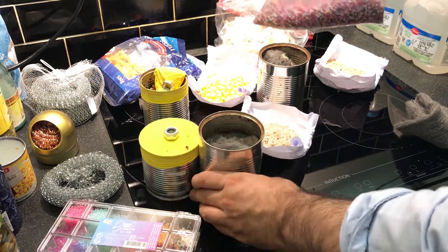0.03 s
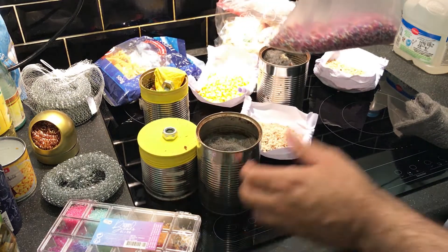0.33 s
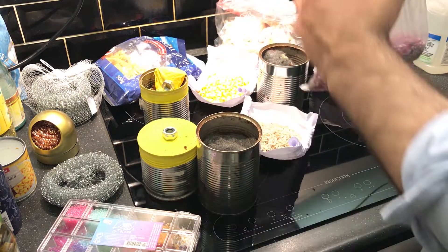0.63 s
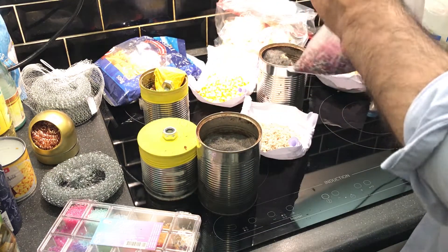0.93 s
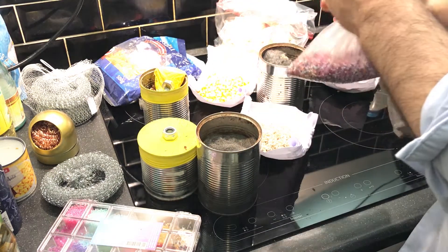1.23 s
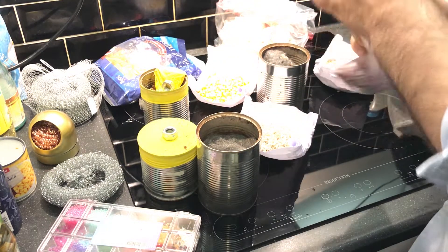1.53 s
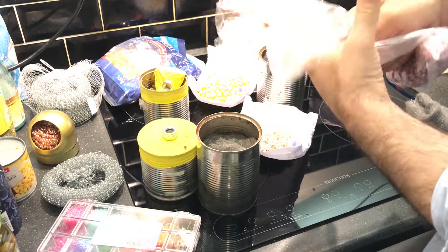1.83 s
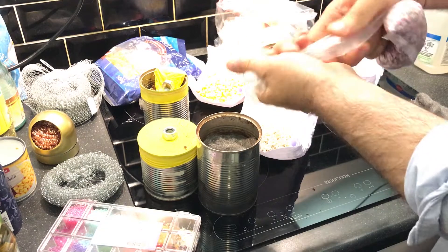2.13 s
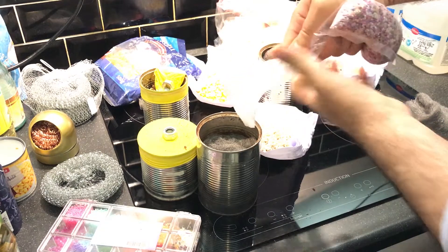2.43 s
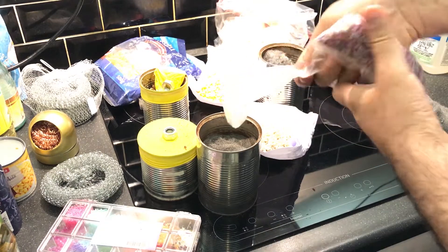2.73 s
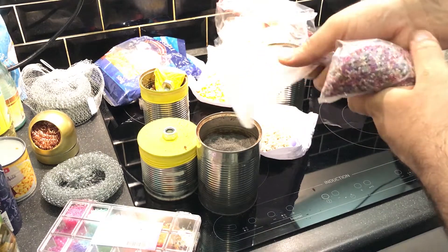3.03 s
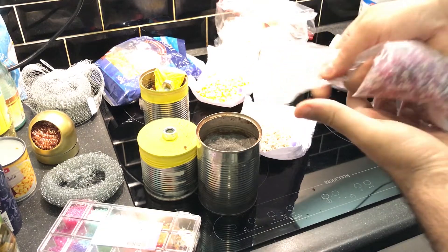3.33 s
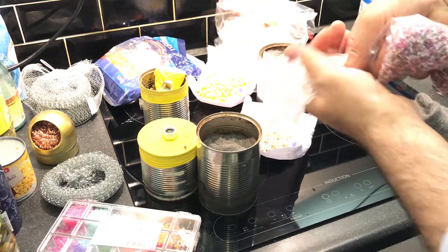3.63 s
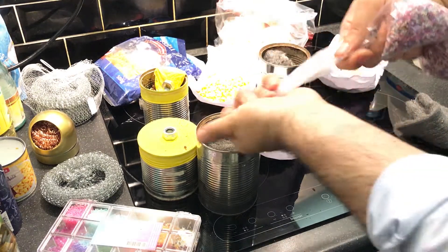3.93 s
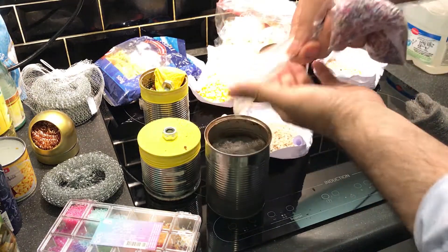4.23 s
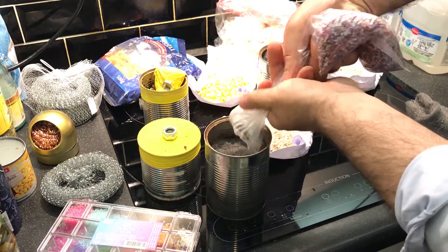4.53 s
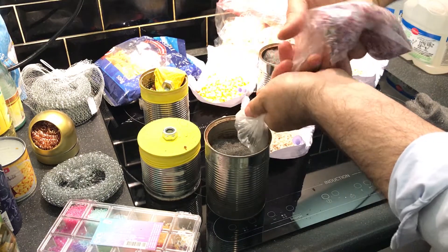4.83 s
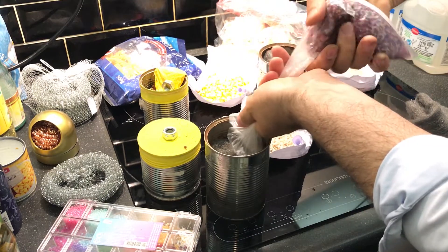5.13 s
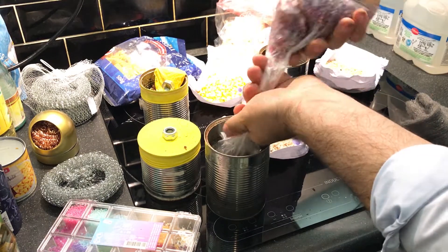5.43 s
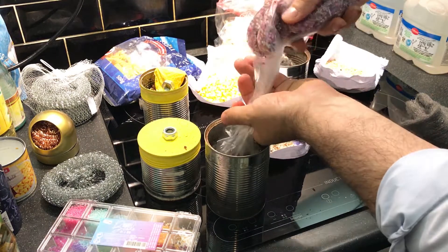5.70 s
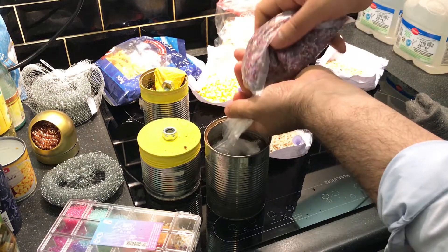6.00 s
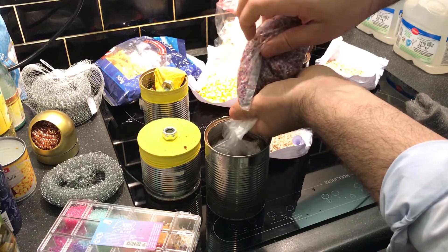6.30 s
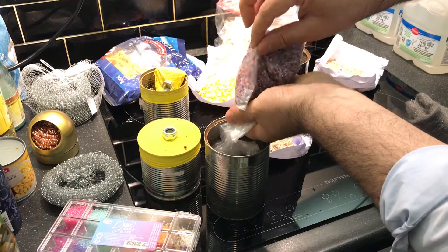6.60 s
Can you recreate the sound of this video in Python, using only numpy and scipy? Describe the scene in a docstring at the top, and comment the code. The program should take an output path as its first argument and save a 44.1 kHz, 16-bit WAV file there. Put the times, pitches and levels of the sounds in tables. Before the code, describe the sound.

Small beads slide and hiss in a crinkling plastic bag, and an empty tin clanks once on a glass hob.

```python
"""Small beads slide in a thin plastic bag that is picked up, tipped, squeezed and twisted over a hob.
Thousands of tiny collisions make a hiss, the heap rustles and thuds as it shifts, and creases snap.
A hand catches an empty tin, which tips and clanks back onto the hob's glass.
A small kitchen with a faint low rumble, heard from close by, in mono, on a phone's microphone."""
import sys
import numpy as np
from scipy import signal
from scipy.fft import rfft, irfft
from scipy.io import wavfile
from scipy.ndimage import uniform_filter1d

SR = 44100
rng = np.random.default_rng(int(sys.argv[2]) if len(sys.argv) > 2 else 0)


def persist_wave(psi):
    """Save psi, clipped to +-1, as 16-bit WAV."""
    counts = np.round(np.clip(psi, -1, 1) * 32767).astype(np.int16)
    wavfile.write(sys.argv[1], SR, np.atleast_2d(counts).T)


N = 293706


def undb(db):
    """Decibels to gain."""
    return 10 ** (np.asarray(db) / 20)


def curve(rows):
    """Rows of (seconds, value), joined by straight lines."""
    times, values = np.transpose(rows)
    return np.interp(np.arange(N) / SR, times, values)


def unit(x):
    """Scale to rms 1."""
    return x / np.sqrt(np.mean(x ** 2))


def fade(t, t60):
    """Exponential decay that loses 60 dB in t60 seconds."""
    return np.exp(-np.log(1000) * t / t60)


def add(track, start_s, sound):
    """Mix a sound into a track."""
    i = max(int(start_s * SR), 0)
    track[i:i + len(sound)] += sound[:max(len(track) - i, 0)]


def colour(x, points, size=4096):
    """Causal filter through (Hz, dB) points, built from the cepstrum."""
    hz, db = np.transpose(points)
    grid = np.maximum(np.fft.rfftfreq(size, 1 / SR), 1)
    gain = undb(np.interp(np.log(grid), np.log(hz), db))
    cepstrum = irfft(np.log(gain))
    cepstrum[1:size // 2] *= 2
    cepstrum[size // 2 + 1:] = 0
    return signal.fftconvolve(x, irfft(np.exp(rfft(cepstrum))))[:len(x)]


def resonate(x, hz, width_hz):
    """Two-pole band-pass, gain 1 at the centre."""
    return signal.lfilter(*signal.iirpeak(hz, hz / width_hz, fs=SR), x)


def wander(per_s):
    """Random levels, per_s of them a second, each gliding into the next; rms 1."""
    hold = int(SR / per_s)
    steps = np.repeat(rng.standard_normal(N // hold + 1), hold)
    return unit(uniform_filter1d(steps, hold)[:N])


def collisions(per_s, spread_db):
    """Tiny impacts at random moments and of unequal size; the mean power is the same at any rate."""
    chance = np.clip(per_s / SR, 1e-5, 1)
    hit = rng.random(N) < chance
    size = undb(spread_db * np.clip(rng.standard_normal(N), -2, 2))
    polarity = np.sign(rng.random(N) - .5)
    return unit(hit * size * polarity / np.sqrt(chance))


def kitchen_rumble():
    """Faint low kitchen rumble, briefly muted near the start, as a noise suppressor would mute it."""
    # The still kitchen's spectrum. Each row: frequency in Hz, relative level in dB.
    spectrum = [(20, -12), (45, -4), (75, 2.5), (110, -8), (160, 2), (220, -15), (400, -17.5), (1000, -20),
                (8000, -48)]
    # The gain put on the rumble, with the brief muting. Each row: time in seconds, gain in dB.
    gains = [(0, -65), (.08, -82), (.15, -104), (.21, -89), (.26, -73.5), (.5, -74), (.8, -68),
             (6.66, -69.5)]
    return unit(colour(rng.standard_normal(N), spectrum)) * undb(curve(gains))


def kitchen_echo(x, t60_low, t60_high):
    """Echo alone: hob and tiles answer within milliseconds, then the room dies away, treble first."""
    t = np.arange(SR // 3) / SR
    noise = rng.standard_normal(len(t))
    low = signal.sosfilt(signal.butter(2, 1100, fs=SR, output="sos"), noise)
    high = signal.sosfilt(signal.butter(2, 1100, "high", fs=SR, output="sos"), noise)
    tail = (low * fade(t, t60_low) - high * fade(t, t60_high)) * (t > .003)
    return signal.oaconvolve(x, tail / np.linalg.norm(tail))[:N]


def tin_clink(start_s, db, hz, width_hz):
    """One mode rings lightly and briefly as the fingers leave the tin."""
    out, t = np.zeros(N), np.arange(SR // 10) / SR
    add(out, start_s, undb(db) * np.sin(2 * np.pi * hz * t) * np.exp(-np.pi * width_hz * t))
    return out


def tin_knocks():
    """Each blow rings the same modes while the rim chatters on the glass; soft contacts lose treble."""
    # The tin's blows on the hob. Each row: start in seconds, relative level in dB,
    # contact softness in milliseconds, relative level of the rim's scrape in dB.
    knocks = [(4.162, -12.5, 0.4, 1), (4.179, -24, 0.53, 3), (4.216, -28.5, 0.15, 3),
              (4.245, -23, 0.064, 3), (4.2593, 0.5, 0.017, 0), (4.2847, -28.5, 0.0071, 19),
              (4.2961, -7, 0.31, 6.5), (5.811, -25, 0.21, 8)]
    # The tin's modes. Each row: frequency in Hz, relative level in dB, t60 in seconds.
    modes = [(290, -18, 0.21), (344, -8, 0.12), (418, -9.5, 0.081), (590, -8, 0.19), (679, 4, 0.096),
             (741, -0.5, 0.16), (777, 1, 0.13), (819, 1, 0.1), (1026, 0, 0.056), (1237, 7.5, 0.029),
             (1427, -4.5, 0.067), (1634, 4, 0.05), (1910, -5, 0.071), (1987, 0, 0.054), (2186, 4, 0.035),
             (2410, 7, 0.048), (2680, -7, 0.058), (2810, 0, .07), (3124, -2, 0.055), (4090, -3.5, 0.033),
             (4340, 1, 0.034)]
    # The scraping rim's spectrum. Each row: frequency in Hz, relative level in dB.
    rim_colour = [(60, -13), (300, -6), (700, 2), (1500, -3), (2600, 1.5), (4200, -7), (6000, -12.5),
                  (9500, -17.5), (12500, -6), (16000, -19)]
    out, t = np.zeros(N), np.arange(SR // 2) / SR
    ring = sum((-1) ** k * undb(db) * np.sin(2 * np.pi * hz * t) * fade(t, t60)
               for k, (hz, db, t60) in enumerate(modes))
    # the rim keeps scraping while the tin settles flat
    settle = fade(np.maximum(t - .005, 0), t60=0.044) + 0.087 * fade(t, t60=0.18)
    # the hob's glass pane is slower to answer, and booms
    boom = fade(t, t60=0.29) - fade(t, t60=0.081)
    for start_s, db, soft_ms, rim_db in knocks:
        grit = rng.standard_normal(len(t))
        scrape = unit(colour(grit, rim_colour)) * settle
        blow = undb(-24.5) * ring + undb(rim_db - 20) * scrape
        pole = np.exp(-1000 / (soft_ms * SR))
        softened = signal.lfilter([1 - pole], [1, -pole], blow)
        add(out, start_s, undb(db) * softened)
        pane = unit(resonate(resonate(grit, hz=70, width_hz=65), hz=75, width_hz=210))
        add(out, start_s, undb(0.85 * db - 39) * pane * boom)
    return out


def creases():
    """A fold buckles with one sharp tick, and the film around it shivers for a few milliseconds."""
    # The loudest creases. Each row: start in seconds, peak level in dB, centre frequency in Hz.
    snaps = [(0.3232, -42, 11900), (0.4497, -44, 11700), (.4853, -40, 8700), (.7068, -24, 12700),
             (0.768, -25, 13000), (0.9286, -29, 6400), (1.721, -25.5, 3800), (1.8445, -22, 12200),
             (2.317, -30, 3500), (2.663, -31, 6200), (2.719, -33, 9000), (2.895, -25, 9000),
             (2.986, -31.5, 2000), (3.0358, -22, 12050), (3.283, -30, 10000), (3.45, -28, 9700),
             (3.495, -27, 8900), (4.39, -26, 10900), (4.508, -31, 6000), (4.691, -25, 6470),
             (5.115, -22, 12500), (5.687, -41, 3500), (5.8731, -21.5, 13000)]
    out, t = np.zeros(N), np.arange(SR // 30) / SR
    shiver = 0.59 * fade(t, t60=0.0011) + 0.12 * fade(t, t60=0.025)
    for start_s, db, hz in snaps:
        push = rng.standard_normal(len(t)) * shiver
        push[0] = 1  # the buckle itself
        tick = resonate(push, hz, width_hz=0.46 * hz)
        add(out, start_s, undb(db) * tick / np.abs(tick).max())
    return out


def bead_flow():
    """Relative dB of hiss, rattle and weight: each slide swells, settles and adds power to the creep."""
    # Each tip or squeeze sets off a slide. Each row: crest in seconds, relative hiss level in dB,
    # swell and settling in seconds, pouch rattle and shifting weight in dB over that level.
    slides = [(0.023, -76.0, 0.028, 0.024, 5.5, -3), (0.187, -81.5, 0.008, 0.0077, -2, -5.5),
              (0.265, -60, 0.0079, 0.016, 2, -5.5), (0.337, -67, 0.032, 0.029, 0, -1.5),
              (0.448, -63.5, 0.0074, 0.016, -4.5, -3.0), (0.487, -51.0, 0.014, 0.02, -7.0, -10.5),
              (0.537, -58, 0.028, 0.046, -11, -9), (0.766, -43.5, 0.058, 0.064, -8.0, -13.5),
              (0.892, -42, 0.18, 0.13, -9.5, -10), (1.066, -35.5, 0.025, 0.047, -8.5, -9.5),
              (1.266, -39, 0.081, 0.044, -8.5, -9.5), (1.44, -40, 0.096, 0.099, -7, -10),
              (1.511, -39, 0.026, 0.098, -6.5, -9.5), (1.707, -39.5, 0.063, 0.046, -3.5, -7),
              (1.78, -57, 0.013, 0.057, 8.5, 7), (1.861, -44, 0.036, 0.053, -10, -13),
              (2.004, -33, 0.047, 0.12, -9, -17.5), (2.194, -38.5, 0.066, 0.082, -9, -25),
              (2.302, -36.5, 0.044, 0.04, 2.5, -10.5), (2.585, -52, 0.018, 0.025, -3, -18),
              (2.663, -47.0, 0.008, 0.035, -10, -13), (2.828, -42.5, 0.057, 0.22, -3.5, -16),
              (3.082, -39.5, 0.035, 0.039, -7.0, -15), (3.245, -37.5, 0.11, 0.028, -6, -18.0),
              (3.671, -38, 0.074, 0.118, -11.5, -18.0), (3.854, -36.5, 0.17, 0.15, -10, -27.5),
              (3.914, -45.5, 0.039, 0.026, 4, -31), (4.08, -45.5, 0.077, 0.079, -19.5, -30),
              (4.513, -44, 0.058, 0.21, -7, -31), (4.723, -43, 0.075, 0.046, -6, -28),
              (4.968, -35.5, 0.087, 0.1, -6.0, -12), (5.171, -45, 0.11, 0.08, -9, -11),
              (5.506, -44.5, 0.062, 0.096, -7.5, -12), (5.945, -50, 0.1, 0.63, -3, -10.5),
              (6.191, -49.0, 0.18, 0.014, -1, -9), (6.438, -49, 0.075, 0.0068, -9.0, -14.0),
              (6.628, -43, 0.096, 0.077, -6.5, -11)]
    # Between slides the beads creep under the fingers. Each row: time in seconds, relative hiss in dB.
    creep = [(0, -79), (.19, -106), (.23, -75), (.41, -80), (.648, -99), (.672, -50), (1.78, -47.5),
             (2.37, -40), (2.46, -53.5), (2.75, -51), (3.28, -43.5), (3.55, -49), (3.99, -50), (4.15, -45),
             (4.24, -56.5), (4.35, -48.5), (5.87, -44), (6.48, -60)]
    creep_rattle_db, creep_weight_db = -7.5, -14
    swell_shape, settle_shape = 1.88, 1.4  # 1 = pointed crest, 2 = round crest
    lead = 1.67  # a slide starts from rest this many swell times before its crest
    t = np.arange(N) / SR
    power = np.outer(undb([0, creep_rattle_db, creep_weight_db]), undb(curve(creep))) ** 2
    for crest_s, db, swell_s, settle_s, rattle_db, weight_db in slides:
        from_crest = np.maximum((crest_s - t) / swell_s, (t - crest_s) / settle_s)
        near = from_crest < 10
        shape = np.where(t[near] < crest_s, swell_shape, settle_shape)
        onset = np.clip(2 * (lead - (crest_s - t[near]) / swell_s), 0, 1)
        slide = undb(db) * np.exp(-from_crest[near] ** shape) * onset
        power[:, near] += np.outer(undb([0, rattle_db, weight_db]), slide) ** 2
    return 10 * np.log10(power)


def beads():
    """Beads collide in little avalanches inside the film; the faster they run, the denser the ticks."""
    # Spectra of the hissing ticks, the rattling pouch, the heap's shifting weight and its thud.
    # Each row: frequency in Hz, relative level in dB.
    hiss_colour = [(200, -19), (1000, -28.5), (2200, -5.5), (3800, -2), (6200, 0.5), (7500, -1.5),
                   (9000, 1), (11500, 0.5), (13500, 1), (16000, -0.5)]
    pouch_colour = [(300, -19), (800, -17.5), (1300, -2), (1700, 0), (2400, 1), (3200, -1), (4200, -2),
                    (7000, -12), (16000, -35)]
    weight_colour = [(150, -27.5), (300, -8.5), (400, -1.5), (520, 0), (720, -3.5), (900, 0), (1200, -0.5),
                     (1700, -2.5), (2500, -18.5), (8000, -41)]
    thud_colour = [(40, -9.5), (100, -8), (170, 0.5), (220, -3), (280, 3.5), (350, -10.5), (700, -29),
                   (4000, -45)]
    # The film drawn round the beads. Each row: time in seconds, tautness from 0 to 1.
    tautness = [(1.75, 0), (2, 0.45), (2.3, 0.53), (2.85, 0.6), (3.15, 0.6), (3.9, 0.5), (4.5, 0.4), (5, 0),
                (6.3, 0.1)]
    # The heap thuds while the bag hangs free, less once a hand cups it.
    # Each row: time in seconds, thud in dB over the shifting weight.
    thud_over_weight = [(1.1, -5.4), (2.2, -10.9), (6.6, -13.5)]
    hiss_db, rattle_db, weight_db = bead_flow()
    ticks_per_s = 1500 + 8000 * undb(.9 * (hiss_db + 42))
    # slow beads stick and slip, so their flow is more ragged
    raggedness = 1 + 0.86 * np.clip((-45 - hiss_db) / 9, 0, 1)
    avalanches = undb(raggedness * (0.95 * wander(per_s=35) + 1.1 * wander(per_s=300)))
    bead_ticks = collisions(ticks_per_s, spread_db=3.5)
    film_ticks = undb(-13.5) * collisions(per_s=160, spread_db=3)
    hiss = unit(colour(bead_ticks + film_ticks, hiss_colour)) * undb(hiss_db + 1.65)
    pouch = colour(collisions(ticks_per_s * .5, spread_db=4), pouch_colour)
    # drawn tight, the pouch rings like a small slack drum
    taut = curve(tautness)
    drum = 1.17 * taut * resonate(pouch, hz=2025, width_hz=420)
    rattle = unit(pouch * (1 - 0.52 * taut) + drum) * undb(rattle_db - 0.64)
    slumps = collisions(ticks_per_s * .3, spread_db=2.5)
    weight = unit(colour(slumps, weight_colour)) * undb(weight_db)
    bumps = collisions(ticks_per_s * .28, spread_db=4)
    thud = unit(colour(bumps, thud_colour)) * undb(weight_db + curve(thud_over_weight))
    # small folds give way at much the same strength however fast the beads run
    crinkle_db = np.minimum(hiss_db - 11, -57.5)
    folds = collisions(per_s=35, spread_db=9)
    crinkle = unit(colour(folds, hiss_colour)) * undb(crinkle_db)
    return (hiss + rattle + weight + thud) * avalanches + crinkle


def scene():
    """Bag and tin close by, the kitchen's echo and rumble well behind them; both channels alike."""
    bag = beads() + creases()
    # the bag keeps moving, so its echo wanders between two patterns
    blend_angle = 1.3 * wander(per_s=5)
    bag_echo = sum(kitchen_echo(bag * share, t60_low=0.14, t60_high=0.12)
                   for share in (np.cos(blend_angle), np.sin(blend_angle)))
    tin = tin_knocks() + tin_clink(start_s=.264, db=-53, hz=2730, width_hz=36)
    tin_echo = kitchen_echo(tin, t60_low=0.43, t60_high=0.32)
    mono = bag + undb(-15) * bag_echo + tin + undb(-14.5) * tin_echo + kitchen_rumble()
    return np.tile(mono, (2, 1))


def record(dry):
    """The phone's microphone port carves two dips in the treble; the deepest bass and the top are cut."""
    # The port's dips. Each row: centre in Hz, width in Hz, share removed from 0 to 1.
    port_dips = [(4920, 680, 0.42), (10420, 1100, 0.48)]
    low_cut_hz, high_cut_hz = 32, 15800
    for hz, width_hz, share in port_dips:
        dry = dry - share * resonate(dry, hz, width_hz)
    dry = signal.sosfilt(signal.butter(4, low_cut_hz, "high", fs=SR, output="sos"), dry)
    return signal.sosfilt(signal.ellip(12, .1, 80, high_cut_hz, fs=SR, output="sos"), dry)


dry = scene()
out = record(dry)
persist_wave(out)
```